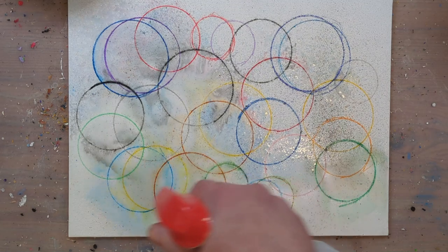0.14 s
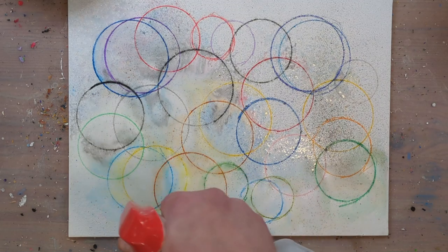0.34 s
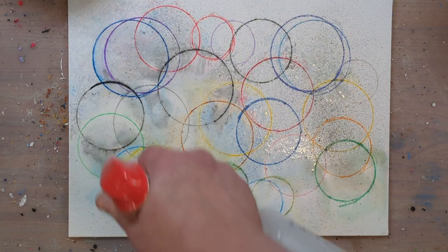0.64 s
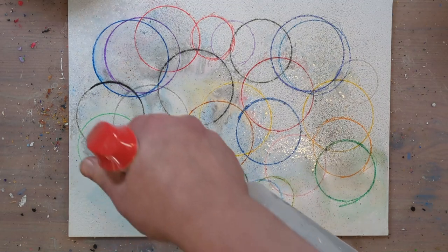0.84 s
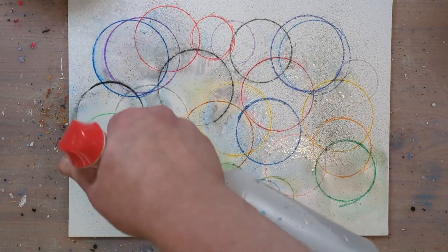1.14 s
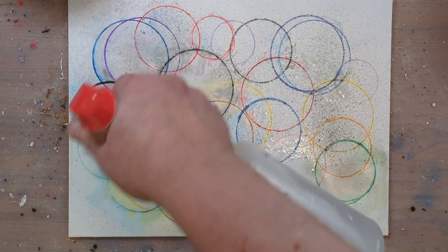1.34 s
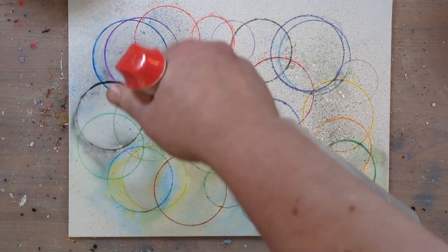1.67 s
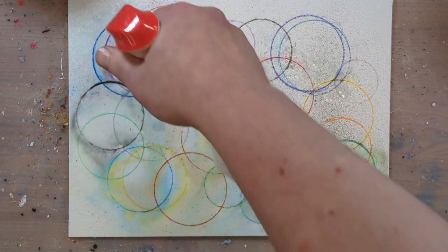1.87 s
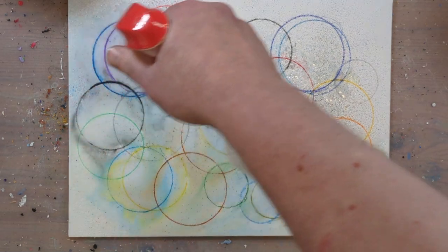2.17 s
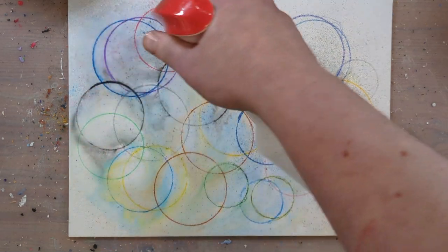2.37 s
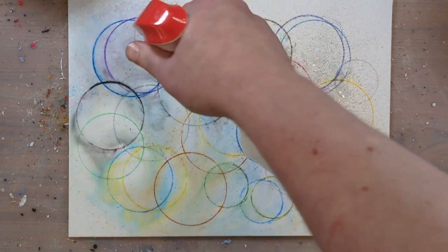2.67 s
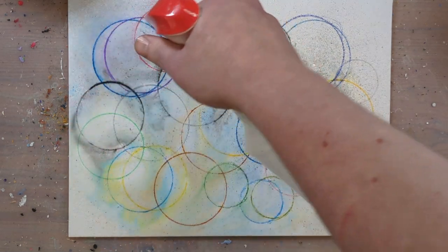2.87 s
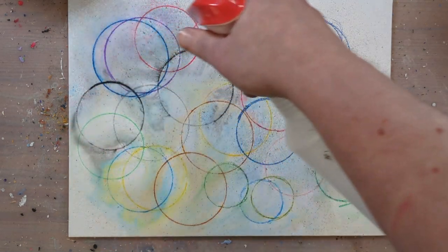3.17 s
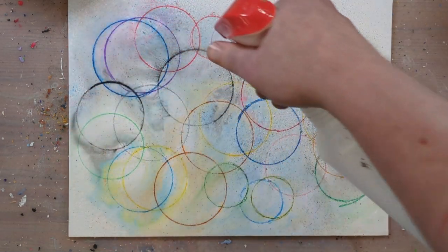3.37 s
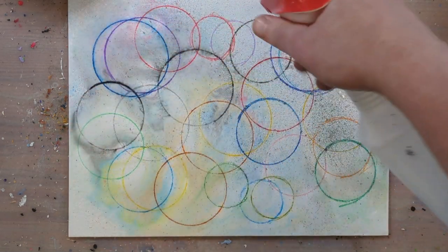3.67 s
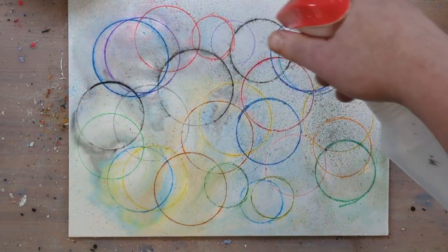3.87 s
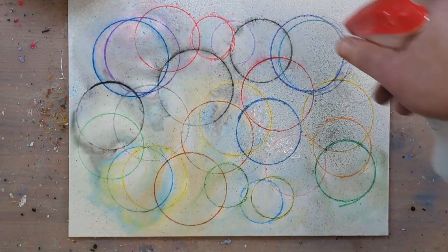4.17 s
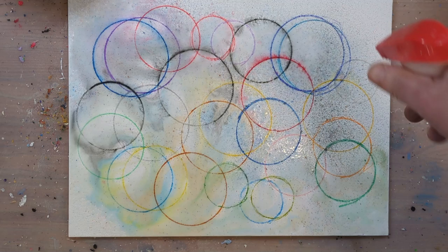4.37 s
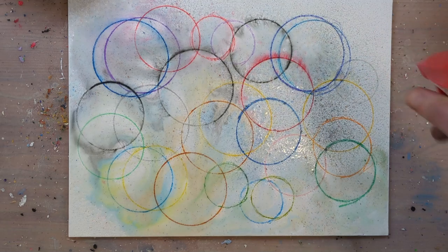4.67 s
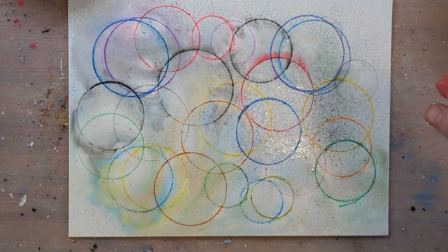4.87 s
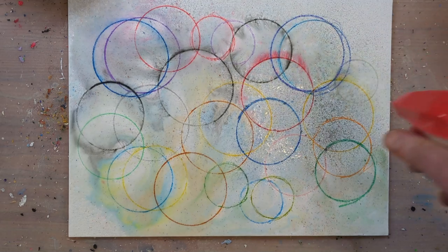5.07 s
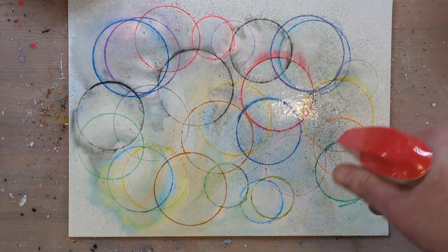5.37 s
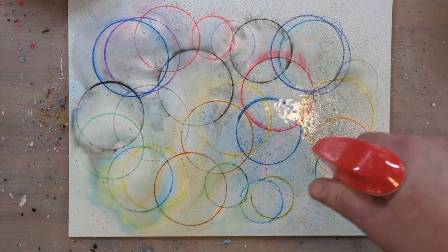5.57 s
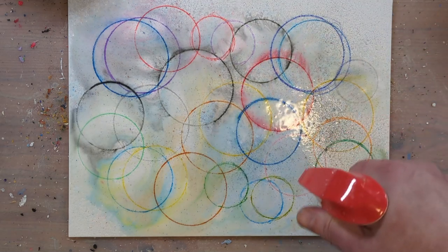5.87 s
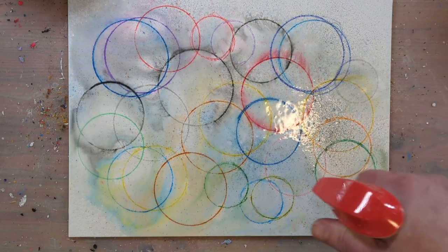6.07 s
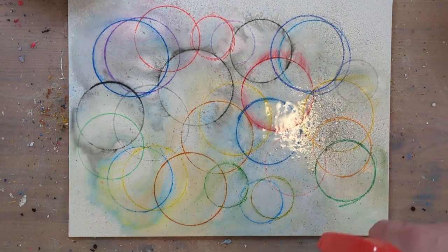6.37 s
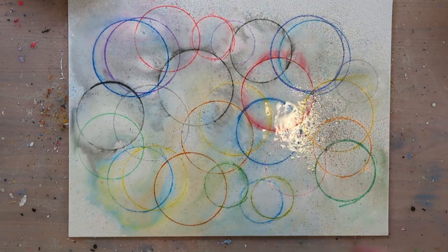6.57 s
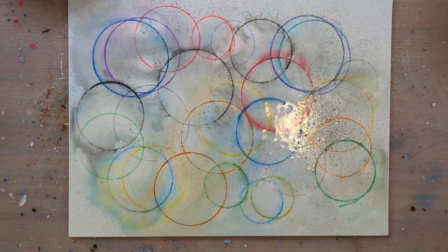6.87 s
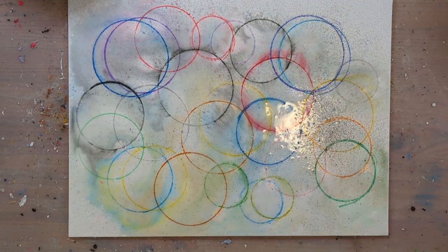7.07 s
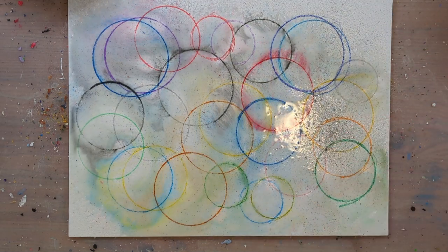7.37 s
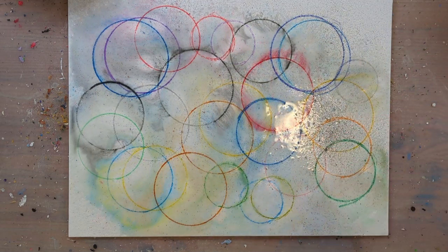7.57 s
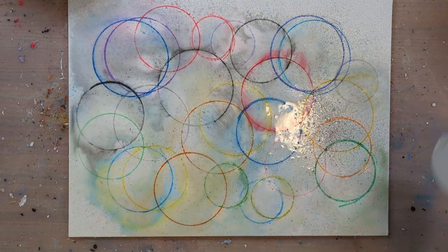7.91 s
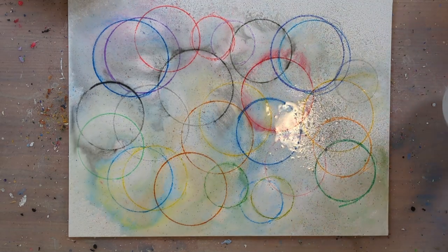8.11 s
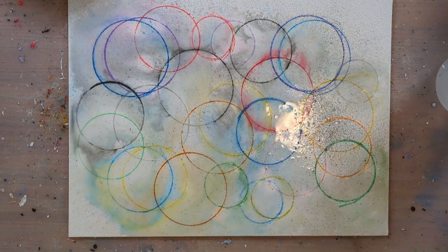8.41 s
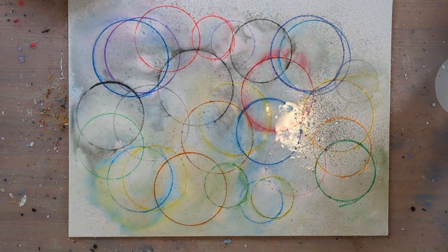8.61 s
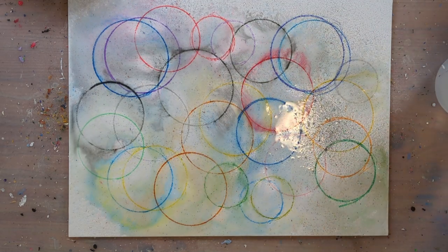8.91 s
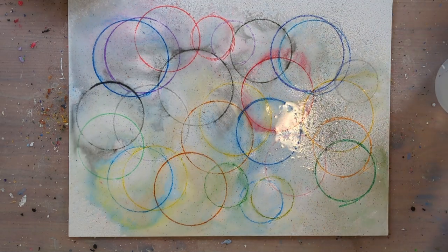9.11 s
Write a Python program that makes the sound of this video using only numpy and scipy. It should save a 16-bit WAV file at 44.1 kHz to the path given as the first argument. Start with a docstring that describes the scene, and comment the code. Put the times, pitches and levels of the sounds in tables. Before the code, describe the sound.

A plastic spray bottle mists paper in quick hissing squirts with trigger clicks and snaps, then is set down with a low thump.

```python
"""A plastic trigger sprayer mists a sheet of paper on a wooden table, close by in a small room. Each squeeze
hisses and makes a pocket of air ring. The nozzle spits, the trigger clicks and later snaps back hard, and air
bubbles into the bottle. At the end the grip scuffs, clothing rustles and the bottle scrapes and is set down
with a low thump. A faint hum and electrical whine lie under it all."""
import sys
import numpy as np
from scipy import signal
from scipy.fft import rfft, irfft, next_fast_len
from scipy.io import wavfile
from scipy.ndimage import uniform_filter1d, map_coordinates

SR = 44100
rng = np.random.default_rng(int(sys.argv[2]) if len(sys.argv) > 2 else 0)


def digitize_waveform(pressure):
    """Quantize a signal to 16-bit integers and store it at the path in sys.argv[1].

    Rows of a 2-D input are taken as channels; values are limited to [-1, 1].
    """
    field = np.atleast_2d(pressure).T
    bounded = np.clip(field, -1, 1)
    quanta = np.round(bounded * 32767).astype(np.int16)
    wavfile.write(sys.argv[1], SR, quanta)


N = 407917
TIME = np.arange(N) / SR


def undb(db):
    """Turn decibels into a gain."""
    return 10 ** (np.asarray(db) / 20)


def fade(t, t60):
    """Die away by 60 dB in t60 seconds, the fade time."""
    return undb(-60 * t / t60)


def unit(x):
    """Scale to an average (rms) level of 1."""
    return x / np.sqrt(np.mean(x ** 2))


def spectrum_db(points, hz):
    """Read levels off a tone colour: a list of (f/Hz, level/dB) points."""
    f, db = np.transpose(points)
    return np.interp(np.log(hz + 1), np.log(f), db)


def noise(colour):
    """Steady noise with this tone colour."""
    size = next_fast_len(N, True)
    gain = undb(spectrum_db(colour, np.fft.rfftfreq(size, 1 / SR)))
    return unit(irfft(rfft(rng.standard_normal(size)) * gain, size)[:N])


def response(colour, size=2048):
    """How an object with this tone colour answers one sharp tap."""
    cepstrum = irfft(np.log(undb(spectrum_db(colour, np.fft.rfftfreq(size, 1 / SR)))))
    # no sound may come before the tap
    cepstrum[1:size // 2] *= 2
    cepstrum[size // 2 + 1:] = 0
    ring = irfft(np.exp(rfft(cepstrum)))
    return ring / np.linalg.norm(ring)


def band(x, hz, kind, order=2):
    """Keep only the lows, the highs or a band between."""
    return signal.sosfilt(signal.butter(order, np.minimum(hz, .45 * SR), kind, fs=SR, output="sos"), x)


def wander(rate_hz):
    """A smooth random wobble, about 1 in size."""
    step = max(int(SR / rate_hz), 1)
    stairs = np.repeat(rng.standard_normal(N // step + 1), step)
    return unit(uniform_filter1d(stairs, step)[:N])


def swell(s, length_s, attack_s, t60):
    """Loudness that builds from time s, holds, then dies away."""
    t = np.maximum(TIME - s, 0)
    return (1 - np.exp(-t / attack_s)) * fade(np.maximum(t - length_s, 0), t60)


def pan(x, db):
    """Make the left side db louder than the right."""
    return np.array([undb(db / 2) * x, undb(-db / 2) * x])


def lean(stereo, sides):
    """Move each frequency left or right, and turn it all down a little."""
    size = next_fast_len(N, True)
    side_db = spectrum_db(sides, np.fft.rfftfreq(size, 1 / SR))
    return irfft(rfft(stereo, size) * pan(0.82, side_db), size)[:, :N]


def add(out, s, x):
    """Mix x into out from time s on."""
    start = int(s * SR)
    x = x[..., max(-start, 0):]
    start = max(start, 0)
    out[..., start:start + x.shape[-1]] += x[..., :N - start]


def squeeze(length_s, crest_s, open_s=0.019, sag_db=35, shut_db_per_s=160):
    """The flow opens quickly, rises and falls with the finger's push, and dies as the valve shuts."""
    t = TIME[:SR // 2]
    push_db = -sag_db * ((t - crest_s) / length_s) ** 2
    shut_db = -shut_db_per_s * np.maximum(t - length_s, 0)
    return (1 - np.exp(-t / open_s)) ** 2 * undb(push_db + shut_db)


# Tone colour of the mist: f/Hz, level/dB
MIST_COLOUR = [(100, -11), (300, -30), (430, -9), (560, -18), (760, -19.5), (1000, 4.5), (1500, 4),
               (2200, 5), (4000, 1.5), (6000, 2.5), (8500, 2), (11500, -2.5), (16000, -6.5)]


def mist(drops_db=-7, drops_per_s=2500):
    """Smooth hiss with a dense patter of larger drops."""
    drops = (rng.random(N) < drops_per_s / SR) * rng.standard_normal(N)
    drops *= undb(1.23 * rng.exponential(size=N))
    hiss = noise(MIST_COLOUR)
    patter = unit(signal.fftconvolve(drops, response(MIST_COLOUR))[:N])
    return hiss + undb(drops_db) * patter


# Pushes on the trigger, levels relative: t/s, length/s, time to full push/s, hiss level/dB,
# air pocket level/dB, valve click level/dB
SQUEEZES = [(-0.105, 0.17, 0.064, -41.5, 2.5, -40.5), (0.38, 0.17, 0.075, -40, -0.5, -38),
            (1.14, 0.16, 0.071, -43.5, -4.5, -40), (1.543, 0.2, 0.074, -43.5, -0.5, -44),
            (2.047, 0.16, 0.037, -42.5, -6, -52), (2.116, 0.069, 0.041, -30.5, -8, -52),
            (2.762, 0.21, 0.11, -38.5, -3, -44), (3.373, 0.19, 0.078, -42, 1, -49),
            (3.809, 0.18, 0.06, -39, -0.5, -60), (4.254, 0.23, 0.076, -40, -2.5, -54),
            (4.838, 0.25, 0.071, -39.5, -7.5, -48), (5.335, 0.23, 0.056, -37, 2.5, -45.5),
            (5.809, 0.21, 0.056, -39, 5, -47), (6.304, 0.21, 0.029, -36.5, 1.5, -48)]
# Where the mist sits: f/Hz, left minus right/dB
MIST_SIDES = [(400, 14), (900, 3), (1600, 5), (3200, 8.5), (5500, 7.5), (8000, 0), (13000, 1.5)]


def spray(pocket_hz=(880, 952), pocket_db=-52, full_ring_db=-44, lag_s=0.012, paper_db=-18):
    """The jet points away, so its hiss arrives scattered, different on each side. It brushes the paper."""
    flow, drive = np.zeros((2, N))
    for s, length_s, crest_s, db, ring_db, _ in SQUEEZES:
        jet = undb(db) * squeeze(length_s, crest_s)
        add(flow, s, jet)
        # swirling air rings a pocket under the grip, a moment late and even at a weak flow
        add(drive, s + lag_s, undb(ring_db) * np.minimum(jet / undb(full_ring_db), 1) ** 0.7)
    hiss = np.array([mist(), mist()]) * flow * undb(1.4 * wander(120))
    pocket = unit(band(rng.standard_normal((2, N)), pocket_hz, "bandpass"))
    pocket *= drive * undb(pocket_db + 2 * wander(30))
    paper = noise([(60, -22), (130, -1), (250, -14.5), (450, -14.5), (900, 0.5), (3000, -25)])
    return lean(hiss + pocket + paper * flow * undb(paper_db), MIST_SIDES)


# Tone colour of the room's air: f/Hz, level/dB
AIR_COLOUR = [(25, -40), (41, -9.5), (60, -9.5), (97, -5), (166, -22.5), (263, -23), (373, -31),
              (695, -32.5), (1000, -23), (2280, -22), (4030, -27), (8000, -26.5), (10000, -31.5),
              (16000, -48.5)]
# Mains hum and electrical whine: f/Hz, level/dB
HUM_TONES = [(97.3, -70), (7643, -69), (8357, -73.5), (9050, -79.5), (9187, -84)]


def air_and_hum(air_db=-62.5):
    """Still room air, alike on both sides in the bass, with hum and a thin whine."""
    highs = band(np.array([noise(AIR_COLOUR), noise(AIR_COLOUR)]), 310, "highpass", order=1)
    lows = band(noise(AIR_COLOUR), 580, "lowpass", order=1)
    hum = sum(np.sqrt(2) * undb(db) * np.sin(2 * np.pi * hz * TIME + 0.15 * wander(13))
              for hz, db in HUM_TONES)
    return undb(air_db) * (highs + lows) + hum


def contact(body, rise_s, t60, size=2048):
    """Plastic catches on plastic: a burst of tiny slips sets a body ringing."""
    t = TIME[:size]
    shape = (1 - np.exp(-t / rise_s)) * fade(t, t60)
    slips = rfft(rng.standard_normal(size) * shape)
    burst = irfft(slips / np.abs(slips)) * np.sqrt(shape)  # even from bass to treble
    return signal.fftconvolve(burst / np.linalg.norm(burst), body)


# Trigger clicks between squeezes, nozzle spits during them: t/s, relative level/dB, lows/dB, treble/dB
LIGHT_TICKS = [(0.702, -35, -4.5, -10), (1.409, -35.5, -13.5, -7), (1.471, -41, -4.5, -15),
               (1.51, -49.5, -4, -16), (1.648, -38, -9, -4), (1.815, -42.5, -4, -7), (1.853, -37, 14.5, -4),
               (1.876, -36.5, -8.5, -8), (2.135, -31, -15, -12), (2.375, -34.5, -5, -8.5),
               (2.499, -46.5, -13, -15), (2.791, -27.5, -22, -8), (3.074, -47.5, -5, -5),
               (3.148, -38, -3.5, -9.5), (3.41, -34, -6, -10), (3.701, -46.5, -8, -25),
               (4.069, -49.5, -1, -3), (4.55, -45.5, -3, -1), (4.597, -43, 2, -10), (4.617, -38.5, -2, -6),
               (5.831, -42, -5, -20), (6.159, -36, 0.5, -9), (6.399, -36, 4, -9), (7.135, -52, -5, -4),
               (7.148, -51.5, -14, -7)]
# Tone colour of a tick: f/Hz, level/dB
TICK_COLOUR = [(100, -3.5), (500, -15), (950, -1.5), (1900, -3), (3000, 0), (3900, -3.5), (4600, -1),
               (6000, -1.5), (8500, -6), (11000, -16.5), (16000, -19)]


def ticks(gain_db=21, low_boost_db=5, treble_boost_db=7, valve_tilt_db=(-9.5, -8.5)):
    """The trigger clicks, the nozzle spits, and the valve clicks shut after each squeeze."""
    out = np.zeros(N)
    hz, body_db = np.transpose(TICK_COLOUR)
    valve = [(s + length_s, db, *valve_tilt_db) for s, length_s, _, _, _, db in SQUEEZES]
    for s, db, low, treble in list(LIGHT_TICKS) + valve:
        tilt_db = spectrum_db([(1400, low + low_boost_db), (3500, 0), (8000, treble + treble_boost_db)], hz)
        body = response(np.c_[hz, body_db + tilt_db])
        add(out, s, undb(db + gain_db) * contact(body, rise_s=0.00062, t60=0.05))
    return out


# Air bubbling through the vent, and one bright ping of a trigger click:
# t/s, starting f/Hz, relative level/dB, fade time/s
SHORT_CHIRPS = [(0.28, 1100, -53.5, 0.021), (.366, 1550, -40.5, 0.03), (.68, 1386, -47.5, 0.1),
                (1.111, 2970, -33.5, 0.015), (1.817, 3000, -56, 0.039), (1.832, 2380, -45, 0.062),
                (1.853, 1600, -48, 0.035), (2.063, 1885, -45, 0.06), (2.311, 2740, -49.5, 0.065),
                (2.562, 1140, -50.5, 0.027), (3.703, 2090, -54, 0.054), (3.787, 1240, -46, 0.035),
                (4.141, 3550, -53, 0.03), (4.225, 1750, -49, 0.021), (4.618, 4600, -26, 0.012),
                (7.447, 1135, -52.5, 0.033)]


def chirps(glide_per_s=4.5):
    """Air bubbles and one trigger ping sound as short, rough chirps that rise in pitch."""
    out, t = np.zeros(N), TIME[:SR // 8]
    for s, hz, db, t60 in SHORT_CHIRPS:
        grit = unit(band(rng.standard_normal(len(t)), 315, "lowpass"))
        chirp = np.sin(2 * np.pi * hz * (t + glide_per_s * t ** 2 / 2))
        shape = (1 - np.exp(-t / 0.00059)) * fade(t, t60)
        add(out, s, undb(db) * chirp * (1 + grit) * shape)
    return out


# The trigger springs back: t/s, relative level/dB, knock/dB, spring/dB, left minus right/dB
TRIGGER_SNAPS = [(4.6179, -24, -25, -7, -1), (5.169, -24.5, 6, -3, -3), (5.199, -21.5, -18, 3.5, -4.5),
                 (5.6516, -21, 4.5, 0.5, -2.5), (5.6816, -22, -14.5, 2, 1.5), (6.112, -23.5, 4, -17, -1),
                 (6.5950, -17.5, -13.5, -21, 3), (6.6020, -20, -13, -4, -3), (6.6239, -28.5, -16.5, 1, 0)]
# Notes of the bottle and spray head: f/Hz, relative level/dB, fade time/s
BOTTLE_NOTES = [(172.5, -7, 0.25), (408.7, -8, 0.22), (1110, -11, 0.21), (1320, 12.5, 0.029),
                (1860, 1.5, 0.069), (2130, 1, 0.061), (2720, 3.5, 0.062), (3275, -1, 0.16),
                (4270, -18, 0.056), (4390, 4.5, 0.11)]
# Tone colours of the hollow knock and of the spring: f/Hz, level/dB
KNOCK_COLOUR = [(80, -28), (180, -14), (330, -19), (450, -3), (650, -10), (1300, -1.5), (1550, -3.5),
                (1800, 4), (2600, 3.5), (3000, -7), (6500, -8), (8200, -10), (11500, -17.5), (16000, -17)]
SPRING_COLOUR = [(90, -55), (200, -9), (400, -26), (650, -17), (1200, -13.5), (1700, -30.5), (3300, -9),
                 (3800, -11), (4500, -8.5), (5700, -15.5), (7000, -14.5), (7600, -5.5), (8300, -4.5),
                 (9300, -17.5), (16000, -41)]


def snaps(gain_db=20, shell_db=-6, rattle_db=-12, bounces_per_s=500):
    """The freed trigger knocks the hollow bottle and its stop; the spring rings, loose parts rattle."""
    out, t = np.zeros((2, N)), TIME[:SR // 8]
    shell = sum(undb(db) * np.sin(2 * np.pi * hz * t) * fade(t, t60) for hz, db, t60 in BOTTLE_NOTES)
    shell *= undb(shell_db) / np.linalg.norm(shell)
    for s, db, knock_db, spring_db, side_db in TRIGGER_SNAPS:
        knock = undb(knock_db) * contact(response(KNOCK_COLOUR), rise_s=0.0082, t60=0.015)
        spring = undb(spring_db) * contact(response(SPRING_COLOUR), rise_s=0.0025, t60=0.0066)
        ring = undb(knock_db / 2) * contact(shell, rise_s=0.001, t60=0.0035)
        bounces = (rng.random(len(t)) < bounces_per_s / SR) * rng.standard_normal(len(t))
        bounces *= fade(t, t60=0.18)
        bounces /= np.linalg.norm(bounces)
        rattle = undb(rattle_db + knock_db / 2) * signal.fftconvolve(bounces, response(TICK_COLOUR))
        for part in (knock, spring, ring, rattle):
            add(out, s, pan(undb(db + gain_db) * part, side_db))
    return out


# Where the pump's sounds sit: f/Hz, left minus right/dB
PUMP_SIDES = [(400, 2.5), (1500, 3), (3200, -1), (5500, 3.5), (8000, -8), (12000, 2)]
# How late they reach the left side: t/s, delay/samples
LEFT_DELAY = [(0, -4.5), (2.8, -4), (3.6, -1), (4.3, 1), (5, 3), (5.5, 0), (9, 0)]


def moving_pump():
    """The hand crosses from left to right, shifting which side hears the pump first."""
    pump = lean(ticks() + snaps() + chirps(), PUMP_SIDES)
    delay = np.interp(TIME, *np.transpose(LEFT_DELAY))
    pump[0] = map_coordinates(pump[0], [np.arange(N) - delay], order=3)
    return pump


def scuff(s=7.506, db=-12.5):
    """One brief, gritty scuff of plastic as the grip shifts."""
    out = np.zeros(N)
    plastic = response([(200, -5), (800, -9), (1150, 1.5), (1900, 4.5), (3500, -3), (8000, -1.5),
                        (12000, -11.5), (15500, -3.5)])
    add(out, s, undb(db) * contact(plastic, rise_s=0.0011, t60=0.17, size=4096))
    return out


# Rustles of clothing, and a short scrape as the bottle is set down (8.556 s): t/s, length/s, relative level/dB
RUSTLES = [(7.592, 0.023, -66), (7.725, 0.07, -61.5), (7.872, 0.047, -65), (8.556, 0.038, -42.5),
           (8.646, 0.58, -62.5)]
# Tone colour of cloth: f/Hz, level/dB
CLOTH_COLOUR = [(200, 11.5), (450, -5), (900, -3), (1200, 3), (1800, -5), (2100, -4.5), (3000, -11),
                (7000, -18), (12000, -23)]


def clothing(gain_db=-3, flutter_db=2.5):
    """Cloth rubs softly as the arm draws back, and the bottle scrapes briefly as it is set down."""
    rubbing = sum(undb(db) * swell(s, length_s, attack_s=0.016, t60=0.25) for s, length_s, db in RUSTLES)
    return noise(CLOTH_COLOUR) * rubbing * undb(gain_db + flutter_db * wander(65))


# Notes of the table top: f/Hz, level/dB, fade time/s
TABLE_NOTES = [(164, -26, 0.11), (263, -41, 0.39), (366, -36, 0.24), (478, -43, 0.21), (690, -42, 0.088)]


def set_down(s=8.546, thud_db=-21, swell_s=0.021, start_hz=145, end_hz=55, sink_s=0.016, rock_db=-47):
    """The bottle lands: a thud sinks in pitch as the table takes its weight, then it rocks to rest."""
    out, t = np.zeros(N), TIME[:SR]
    thud_hz = end_hz + (start_hz - end_hz) * np.exp(-t / sink_s)
    push = (t / swell_s * np.exp(1 - t / swell_s)) ** 2
    add(out, s, undb(thud_db) * push * np.sin(2 * np.pi * np.cumsum(thud_hz) / SR))
    onset = 1 - np.exp(-t / 0.0048)
    for hz, db, t60 in TABLE_NOTES:
        add(out, s, undb(db) * onset * np.sin(2 * np.pi * hz * t) * fade(t, t60))
    rumble = noise([(30, -39), (50, -3), (75, -2), (100, -8.5), (170, -37), (260, -22), (500, -44),
                    (1500, -53)])
    return out + rumble * undb(rock_db) * swell(s, length_s=0.29, attack_s=0.014, t60=0.94)


def room(x, early_db=-4, late_db=-7):
    """Sound bounces quickly off table and arm, then dies away in the room, the treble first."""
    t = TIME[:SR // 2]
    early, late = rng.standard_normal((2, 2, len(t)))
    early *= (t > .0015) * fade(t, t60=0.051)
    lows = band(late, 1240, "lowpass", order=1)
    highs = late - lows
    tail = (t > .007) * (lows * fade(t, t60=0.25) + highs * fade(t, t60=0.19))
    echo = (undb(early_db) * unit(early) + undb(late_db) * unit(tail)) / np.sqrt(len(t))
    echo = band(echo, 340, "highpass")
    return x + signal.fftconvolve(x, echo, axes=1)[:, :N]


def scene():
    """Sprayer and clothing echo in the room; the thump, air and hum are added without echo."""
    pump = moving_pump()
    return room(spray() + pump + clothing() + scuff()) + set_down() + air_and_hum()


def record(dry, bottom_hz=45, top_hz=16050):
    """Cut the deepest bass and the highest treble."""
    dry = band(dry, bottom_hz, "highpass", order=4)
    return signal.sosfilt(signal.ellip(10, .2, 70, top_hz, fs=SR, output="sos"), dry)


dry = scene()
out = record(dry)
digitize_waveform(out)
```